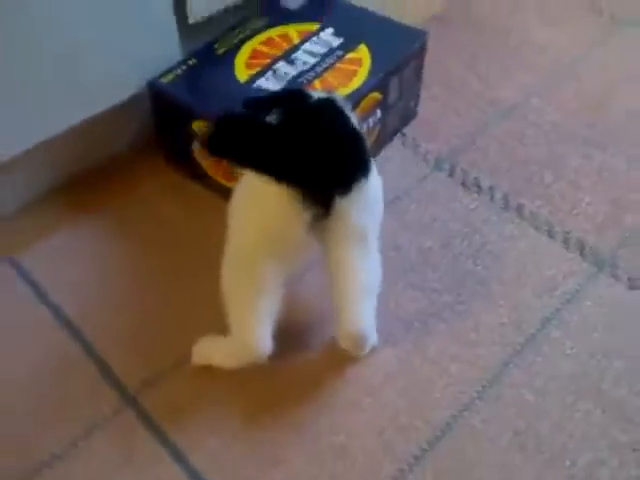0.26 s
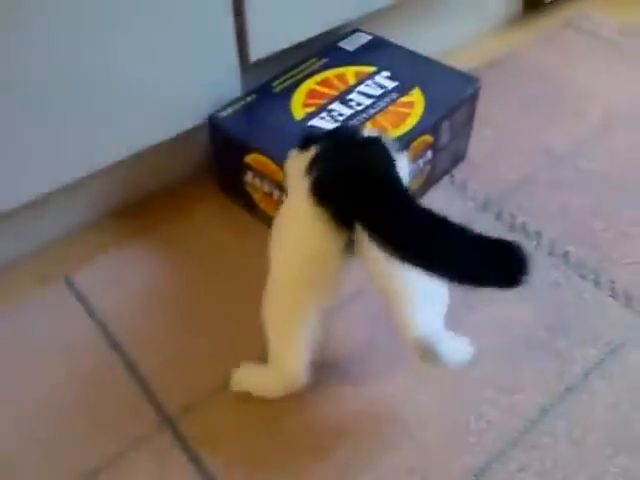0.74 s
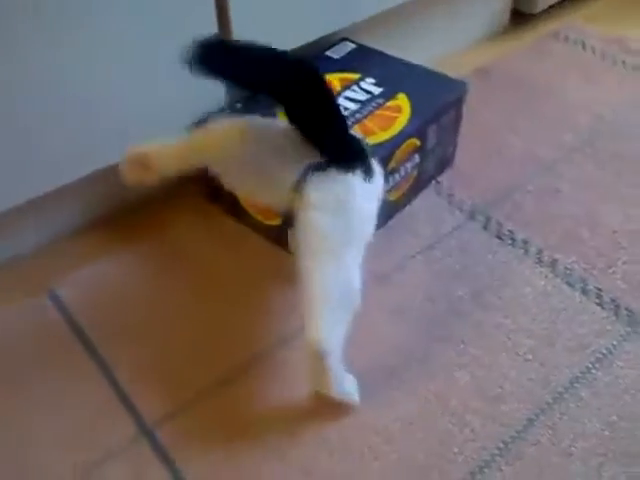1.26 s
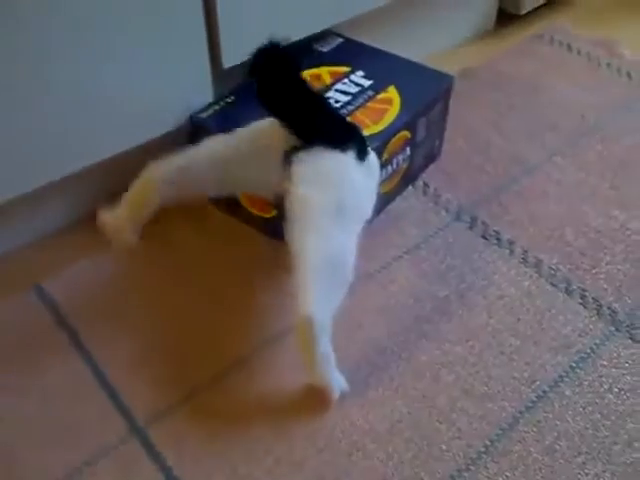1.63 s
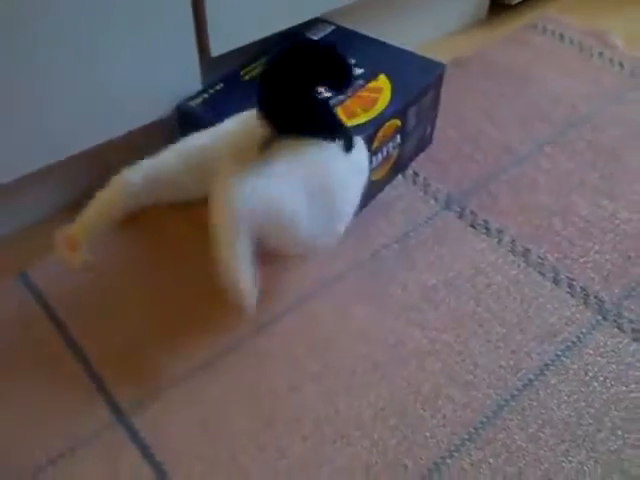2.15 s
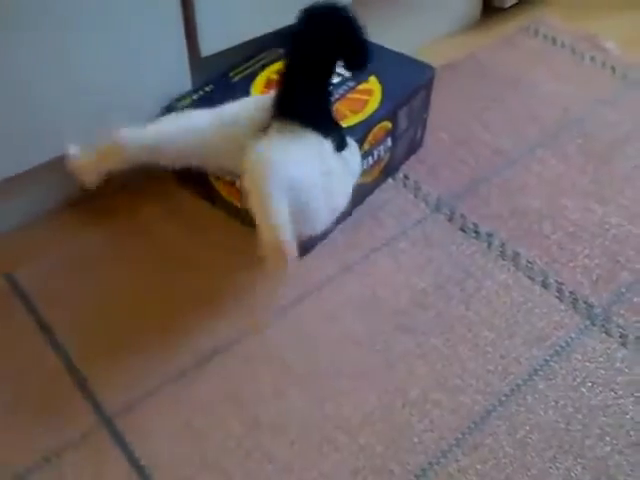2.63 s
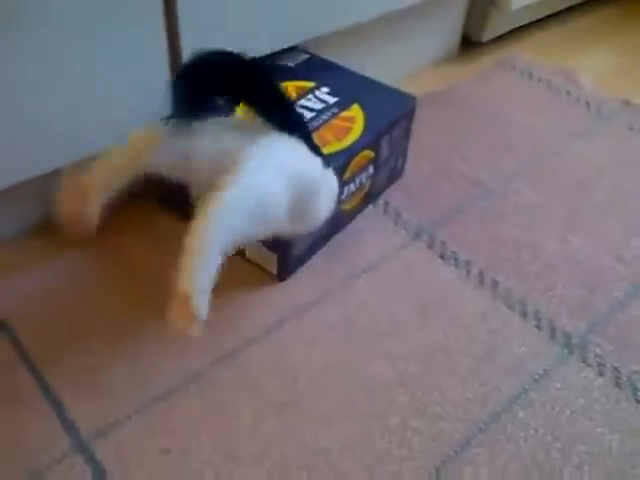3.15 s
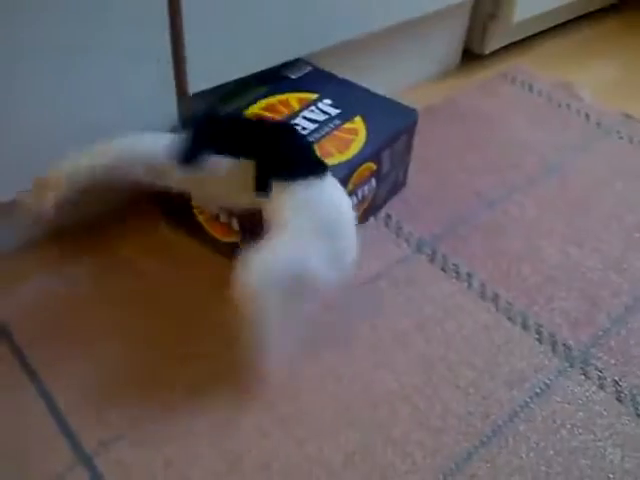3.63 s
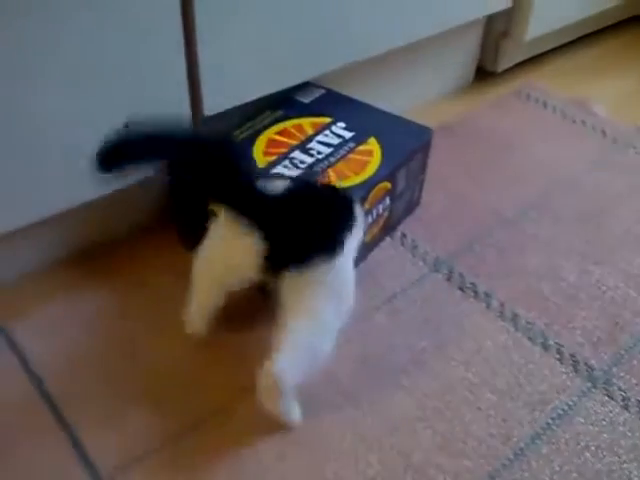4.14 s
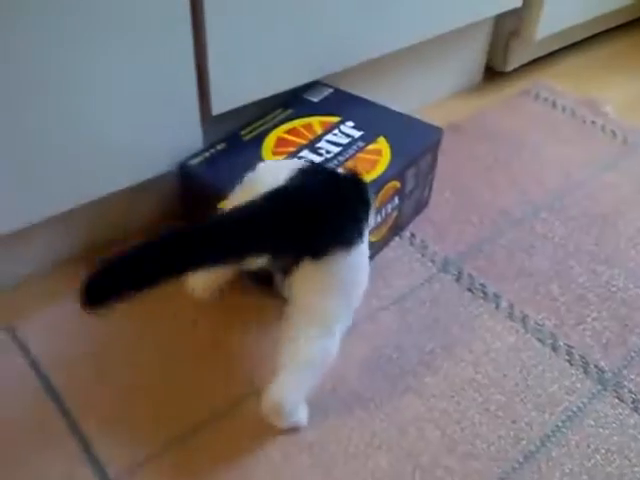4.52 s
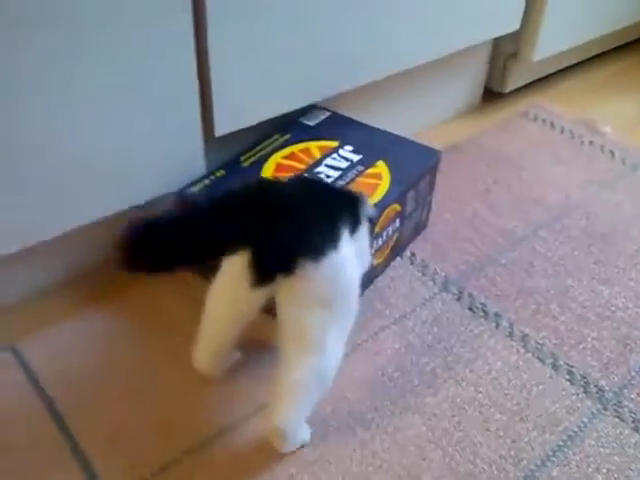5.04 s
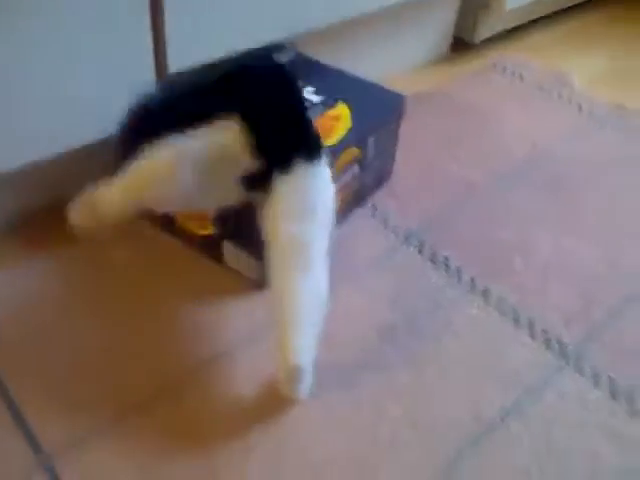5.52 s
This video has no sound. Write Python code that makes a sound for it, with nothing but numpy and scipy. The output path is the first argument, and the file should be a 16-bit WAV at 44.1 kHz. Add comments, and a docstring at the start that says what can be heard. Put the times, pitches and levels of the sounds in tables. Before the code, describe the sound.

A small tiled kitchen heard close on a handheld camera, with faint low rumble, slight hiss and a soft appliance hum. After near-quiet, a light skid and small card ticks begin at 0.35 s, with rubbing near 0.5 and 0.8 s. Sharp snaps crack at about 1.15 s, then a dull bump at 1.3 s and soft thuds and dragging fur around 1.6 s. From 1.8 to 2.1 s a dense burst of scraping, rasping and snapping peaks, followed by quick scuffs and knocks from 2.4 to 2.75 s. It thins to faint rustles and small scuffs, with knocks at 3.4 and 3.86 s. At 4.2 s comes the loudest crack and hollow scrape, trailing into rubbing until about 4.7 s. Another skid follows at 4.85 s, then a low handling bump with a tiny creak at 5.3 s, and muffled box thumps at 5.55 and 5.72 s. Short, bright room echo throughout.

```python
"""A tiled kitchen: a cat shoves its way into a cardboard box on the floor, heard from close by.
The box skids in tiny slips that ring its panels; fur and paws rub and crackle the card.
Snaps are chirps spread by bending waves, panel thocks and padded paw thuds are damped flexes.
Box modes colour the friction and knocks; a short room echo colours these and the paw thuds.
Bumps and creaks of a hand-held camera stay dry, over a wavering noise floor and an appliance's two-tone hum."""
import sys
import numpy as np
from scipy import signal
from scipy.fft import rfft, irfft, next_fast_len
from scipy.io import wavfile
from scipy.ndimage import uniform_filter1d

SR = 44100
rng = np.random.default_rng(int(sys.argv[2]) if len(sys.argv) > 2 else 0)


def materialize(psi):
    """Save the field psi as 16-bit PCM at rate SR to the path in sys.argv[1].

    A 1-D psi becomes a single channel; in a 2-D psi each row is a channel.
    """
    bounded = np.clip(np.atleast_2d(psi).T, -1, 1)
    quanta = np.round(bounded * 32767).astype(np.int16)
    wavfile.write(sys.argv[1], SR, quanta)


N = 254455
TIME = np.arange(N) / SR  # s

# spectrum of fur and paws on card, shared by rub and crackle: (frequency [Hz], level [dB])
RUB_SPECTRUM = [(80, -15), (200, -7), (400, -1), (700, 1), (1200, -2.5), (2000, 0), (2800, 0.5),
                (3500, -2.7), (4500, -9.5), (6000, -17), (8000, -22), (11500, -28), (15500, -42.5)]


def undb(db):
    """Decibels to gain."""
    return 10 ** (np.asarray(db) / 20)


def unit(x):
    """Scale to rms 1."""
    return x / np.sqrt(np.mean(x ** 2))


def add(track, s, sound):
    """Mix a sound into the track at a time in seconds."""
    start = int(s * SR)
    track[start:start + len(sound)] += sound[:N - start]


def filtered(x, response):
    """Filter by a response given as a function of frequency in Hz."""
    size = next_fast_len(2 * len(x))
    f = np.arange(size // 2 + 1) * SR / size + 1e-6  # the offset avoids dividing by 0 Hz
    return irfft(rfft(x, size) * response(f), size)[:len(x)]


def colour(f, points):
    """Gain along (frequency [Hz], level [dB]) points, straight on a log frequency scale."""
    hz, db = np.transpose(points)
    return undb(np.interp(np.log(f), np.log(hz), db))


def above(f, hz):
    """Smooth crossover: near 0 well under hz, near 1 well over it."""
    return 1 / (1 + (hz / f) ** 8)


def fade(t, t60):
    """Exponential decay by 60 dB in t60 seconds."""
    return np.exp(-np.log(1000) * t / t60)


def walk(rate):
    """Smooth random wander of rms 1, with a new target rate times a second."""
    size = max(int(SR / rate), 1)
    steps = np.repeat(rng.standard_normal(N // size + 1), size)
    return unit(uniform_filter1d(steps, size)[:N])


def slips(rate, spread_db, patchy_db, patch_rate):
    """Friction as random tiny slips, rate a second, of uneven size and wandering strength."""
    sizes = rng.standard_normal(N) * undb(spread_db * rng.standard_normal(N))
    happens = rng.random(N) < rate / SR
    return unit(sizes * happens * undb(patchy_db * walk(patch_rate)))


def bend(f, lag_s):
    """Bending waves in a sheet: highs arrive first; lag_s is the delay at 1 kHz."""
    return np.exp(-4j * np.pi * lag_s * np.sqrt(1000 * f))


def flex(t, hz, cycles):
    """A heavily damped sheet: its envelope swells to 1 after so many cycles, then dies away."""
    age = t * hz / cycles
    return np.sin(2 * np.pi * hz * t) * age * np.exp(1 - age)


def swell(start, attack, hold, release):
    """One move, in seconds: it gathers force, holds, then falls by 20 dB per release time."""
    age = TIME - start
    rise = np.sin(np.pi / 2 * np.clip(age / attack, 0, 1)) ** 2
    return rise * undb(-20 * np.maximum(age - attack - hold, 0) / release)


def moves(fidget_db=1.5, fidget_rate=22, jerk_db=0.6, jerk_rate=40):
    """Gains of skid, rasp, boom and hiss: the cat's moves add in power, and all jerk together."""
    # the box slides over the tiles, level before the skid's own trim:
    # (start [s], attack [s], hold [s], release [s per 20 dB], level [dB])
    slides = [ (0.345, .018, .475, .156, -41), (0.66, .025, .03, .06, -41), (0.827, .049, .07, .214, -36),
              (1.389, .2, .243, .177, -42.8), (1.824, .054, .081, .091, -36.5),
              (1.915, .035, .019, .34, -33.9), (2.206, .035, .014, .054, -38.5),
              (3.78, .04, .01, .04, -50.5), (4.229, .025, .018, .28, -27.5),
              (4.492, .097, .052, .295, -42.5), (4.853, .027, .05, .381, -41.2),
              (5.603, .095, .04, .096, -47.5)]
    # strokes of the body along the card, levels before the rub's own trims: (start [s], attack [s],
    # hold [s], release [s per 20 dB], level [dB], boom over level [dB], hiss over level [dB])
    strokes = [ (0.348, .117, .262, .14, -53, -5, -17), (0.484, .06, .022, .04, -44.5, -13, -20),
               (0.79, .11, .04, .2, -41.3, -22, -16), (1.487, .11, .02, .07, -40, 0, -20),
               (1.63, .084, .025, .16, -38.3, -19, -15.5), (1.815, .05, .055, .096, -40.3, -10, -30),
               (1.905, .05, .022, .045, -29.5, -11, -10), (1.974, .045, .01, .21, -33.8, -13, -26),
               (2.2, .038, .028, .04, -46.5, 0, -22), (3.139, .04, .025, .12, -53.5, -14, -16),
               (3.325, .051, .06, .3, -54.7, 3, -9), (4.282, .068, .07, .09, -40.3, 2, -14),
               (4.408, .116, .375, .286, -43, -13, -17.5), (4.865, .035, .085, .158, -49, 0, -11),
               (5.385, .05, .045, .053, -44.5, -18, -11), (5.512, .025, .163, .107, -64, 8, -14),
               (5.716, .01, .05, .1, -51, 6, -15)]
    # short kicks that jog the box and scuff its wall, levels before those trims:
    # (time [s], skid level [dB], rub over skid [dB], release [s per 20 dB])
    scuffs = [ (0.262, -56, -12, .026), (1.159, -41, -5, .121), (2.383, -39, -9, .062),
              (2.444, -38.3, -4, .07), (2.515, -47, 3, .055), (2.561, -43.2, 9, .17),
              (2.738, -45.2, -1, .092), (2.982, -52.5, -6, .021), (3.048, -46, -7, .029),
              (3.287, -42, -2, .2), (3.394, -36.5, -3, .142), (3.693, -46.5, -13, .025),
              (3.862, -39.2, -10, .121), (4.045, -46.6, -12, .031), (4.212, -33.5, 4, .2),
              (5.218, -44.5, -11, .05), (5.716, -37.5, -8, .165)]
    # restless rustle between moves, before fidgets, jerks and trims: (time [s], level [dB])
    rustle_levels = [(0, -76), (0.19, -90), (1.39, -68), (1.44, -57), (2.34, -67), (3.13, -68), (3.6, -64),
                     (4.19, -57), (5.14, -59), (5.44, -63), (5.77, -57)]
    rustle_mix_db = [2.4, 0, -1.2, -8.4]  # skid, rasp, boom, hiss
    scuff_attack_s, scuff_hold_s = .007, .007
    scuff_boom_db, scuff_hiss_db = -8, -23  # boom against skid, hiss against rasp

    rustle = undb(np.interp(TIME, *np.transpose(rustle_levels)) + fidget_db * walk(fidget_rate))
    power = np.outer(undb(rustle_mix_db), rustle) ** 2
    for *shape, db in slides:
        power[0] += (undb(db) * swell(*shape)) ** 2
    for *shape, db, boom_db, hiss_db in strokes:
        mix = undb([db, db + boom_db, db + hiss_db])
        power[1:] += np.outer(mix, swell(*shape)) ** 2
    for s, db, rub_db, release in scuffs:
        mix = undb(db) * undb([0, rub_db, scuff_boom_db, rub_db + scuff_hiss_db])
        power += np.outer(mix, swell(s, scuff_attack_s, scuff_hold_s, release)) ** 2
    return np.sqrt(power) * undb(jerk_db * walk(jerk_rate))


def skid(gain, free_db=-3, loaded_db=-4):
    """The base judders over the tiles and rings the bottom panel; the cat's weight broadens the ring."""
    # spectrum of the empty box skidding: (frequency [Hz], level [dB])
    free_spectrum = [(300, -40), (650, -24), (850, -13), (1030, -3), (1170, 0), (1320, -2), (1600, -14),
                     (2100, -26), (5000, -46)]
    # spectrum with the cat's weight on the box: (frequency [Hz], level [dB])
    loaded_spectrum = [(300, -27), (650, -10.5), (900, -1.5), (1050, 0.5), (1300, 2), (1600, -6.5),
                       (1900, -7), (2500, -12.5), (5000, -42.5)]
    climbs_in_s = 1.14
    judder = slips(rate=2500, spread_db=0.2, patchy_db=0.9, patch_rate=78)
    free = undb(free_db) * unit(filtered(judder, lambda f: colour(f, free_spectrum)))
    loaded = undb(loaded_db) * unit(filtered(judder, lambda f: colour(f, loaded_spectrum)))
    return gain * np.where(TIME < climbs_in_s, free, loaded)


def rub(rasp_gain, boom_gain, hiss_gain, rasp_db=-1.0, boom_db=-3, hiss_db=-2, boom_hz=800, hiss_hz=5500):
    """Fur and paws drag on the card: hollow boom, middle rasp and top hiss each follow their own gain."""
    grains = slips(rate=10000, spread_db=1.5, patchy_db=2, patch_rate=75)
    drag = filtered(grains, lambda f: colour(f, RUB_SPECTRUM))
    rasp = unit(filtered(drag, lambda f: above(f, boom_hz) - above(f, hiss_hz)))
    boom = unit(filtered(drag, lambda f: 1 - above(f, boom_hz)))
    hiss = unit(filtered(drag, lambda f: above(f, hiss_hz)))
    middle_and_low = undb(rasp_db) * rasp_gain * rasp + undb(boom_db) * boom_gain * boom
    return middle_and_low + undb(hiss_db) * hiss_gain * hiss


def crackle(gain, db=-11, rate=130, spread_db=3, lag_s=0.001225):
    """The card creases as it is pressed: sparse ticks, bent into chirps, that grow with the rubbing."""
    signs = rng.choice([-1, 1], N)
    happens = rng.random(N) < rate / SR
    ticks = signs * happens * undb(spread_db * rng.standard_normal(N))
    creases = filtered(ticks, lambda f: colour(f, RUB_SPECTRUM) * bend(f, lag_s))
    return undb(db) * gain * unit(creases)


def knocks(snap_db=6, thock_db=-1, lag_s=.0012, chatter=0.21, chatter_t60=0.022, cycles=0.74):
    """Each blow sends a falling chirp through the card; flaps chatter and the struck panel flexes."""
    # snaps and knocks of the card, strengths before the trims snap_db and thock_db: (time [s],
    # snap strength [dB], sharpness [dB], panel thock level [dB], panel pitch [Hz])
    blows = [ (0.358, -41, -5, -36, 1210), (0.393, -43, -8, -28, 1140), (0.553, -32, -2, -25, 1350),
             (0.939, -31, 0, -19, 1360), (1.105, -43, 6, -37, 4400), (1.148, -21, 8, -16, 4750),
             (1.157, -18.5, 0, -27, 740), (1.1627, -17.5, 11, -19, 4950), (1.728, -27, -3, -28, 1230),
             (1.845, -19.5, -18.5, -20, 1330), (1.907, -28, 8, -40, 1210), (1.945, -14.5, 14, -29, 1000),
             (1.966, -12, -2, -33, 900), (2.025, -14.5, -5, -23, 1200), (2.090, -22, 2, -23, 4300),
             (2.445, -17, -13, -26.5, 700), (2.514, -20, -7.5, -29, 1070), (2.560, -12.5, -17, -25, 1300),
             (2.577, -22, -6, -24, 1400), (2.618, -17, -7, -36, 1000), (2.735, -15.5, -5, -32, 1190),
             (2.985, -39, -8, -42, 650), (3.051, -47, -8, -40, 1020), (3.289, -31, 2, -31, 1200),
             (3.394, -32, 0, -21, 1510), (3.503, -42, -15, -35, 414), (3.699, -38, -14, -35, 606),
             (3.860, -16.5, -4.5, -20, 807), (3.887, -18, -1, -31, 900), (4.211, -1.5, 0, -16.5, 1290),
             (4.245, -13, -12, -10.5, 1130), (4.268, -29, -11, -13, 1150), (4.339, -17, -2, -26, 805),
             (4.405, -16, -4, -30.5, 630), (4.796, -20, 0, -34, 1240), (5.198, -38, -10, -35, 450),
             (5.220, -44, -8, -33, 1200), (5.715, -20.5, -16, -21, 700), (5.743, -43, -12, -28, 1120)]
    # spectrum of a snap: (frequency [Hz], level [dB])
    snap_spectrum = [(80, -16), (250, -9.5), (500, -1.5), (1000, 1), (2000, 5), (3500, 3), (5000, -2.5),
                     (7000, -5.5), (11500, -13), (15500, -30)]
    out, t = np.zeros(N), TIME[:4096]
    noises = rng.standard_normal((len(blows), len(t)))
    for (s, strength_db, sharp_db, panel_db, panel_hz), noise in zip(blows, noises):
        blow = (t == 0) + chatter * noise * fade(t, chatter_t60)
        contact = [(2800, 0), (5400, sharp_db)]  # sharpness tilts the treble
        snap = filtered(blow, lambda f: colour(f, snap_spectrum) * colour(f, contact) * bend(f, lag_s))
        add(out, s, undb(strength_db + snap_db) * snap / np.linalg.norm(snap))
        # the slow bending wave sets the whole panel moving a moment after the snap
        add(out, s + lag_s, undb(panel_db + thock_db) * flex(t, panel_hz, cycles))
    return out


def thuds(db=-1, cycles=0.43):
    """Padded paws and body push softly, so only a damped low flex sounds."""
    # soft falls of paws and body, before the trim db: (time [s], level [dB], pitch [Hz])
    falls = [(1.331, -34, 420), (1.533, -37.5, 167), (1.589, -34, 137), (1.613, -27.5, 164),
             (1.701, -47, 120), (2.224, -40, 270), (2.457, -45, 108), (3.052, -43, 88), (3.42, -39.5, 162),
             (3.502, -47, 191), (3.70, -37, 166), (4.084, -45.5, 188), (4.212, -40.5, 91),
             (4.365, -37.5, 162), (4.596, -41, 120), (4.933, -39, 130), (4.997, -42, 119),
             (5.198, -37, 139), (5.531, -34, 98), (5.564, -32, 118), (5.717, -29, 160), (5.719, -29, 373),
             (5.729, -25, 129)]
    out, t = np.zeros(N), TIME[:SR // 4]
    for s, level_db, hz in falls:
        add(out, s, undb(level_db + db) * flex(t, hz, cycles))
    return out


def box(x, db=-1):
    """The hollow box adds narrow resonances to the friction and knocks that shake it."""
    # modes of the box, before the trim db: (frequency [Hz], width [Hz], gain [dB])
    modes = [(704, 15, -15.5), (900, 21, -5.5), (1042, 7.6, -1), (1163, 17, -20.5), (1262, 15, -6.5),
             (1321, 48, -11), (1520, 19, -2), (1640, 66, -6), (1848, 48, -4.5), (2100, 11, -3),
             (2336, 26, -9.5), (2540, 9.5, -16)]

    def response(f):
        """Direct sound plus one resonance per mode."""
        total = 1
        for hz, width, gain_db in modes:
            total = total + undb(gain_db) / (1 + 1j * (f * f - hz * hz) / (f * width))
        return total

    return undb(db) * filtered(x, response)


def kitchen(x, wet_db, low_t60=0.32, high_t60=0.24, split_hz=5000, gap_s=0.0019):
    """Tiles and cupboard doors return a dense, short echo whose treble dies first."""
    t = TIME[:SR // 2]
    noise = rng.standard_normal(len(t)) * (t > gap_s)
    high = filtered(noise, lambda f: above(f, split_hz))
    echo = (noise - high) * fade(t, low_t60) + high * fade(t, high_t60)
    return x + undb(wet_db) * signal.fftconvolve(x, echo / np.linalg.norm(echo))[:N]


def handling(jolt_hz=150, jolt_cycles=0.12, creak_hz=3100, creak_cycles=.9, shell_hz=1100, shell_cycles=0.49,
             shell=1.0):
    """The hand bumps and creaks the camera: decaying low sways, damped jolts and flexes, with no room."""
    # bumps of the hand: (time [s], sway level [dB], pitch [Hz], 60 dB decay [s], share of hard jolt [0-1])
    bumps = [(0.505, -39, 44, 0.25, .2), (0.575, -38, 60, 0.13, .3), (0.864, -30.5, 52.5, 0.13, .7),
             (1.333, -25.5, 56.4, 0.045, .8), (2.347, -45, 45.5, 0.32, .1), (2.56, -32, 61, 0.1, .5),
             (3.151, -45, 50, 0.11, .5), (5.298, -28.5, 40.6, 0.22, .6), (5.72, -41, 40, .15, .8)]
    # creaks of the camera's shell: (time [s], level [dB])
    creaks = [(5.299, -36), (5.3079, -27.5)]
    out, t = np.zeros(N), TIME[:SR // 4]
    for s, level_db, hz, t60, jolt in bumps:
        sway = np.sin(2 * np.pi * hz * t) * fade(t, t60)
        add(out, s, undb(level_db) * (sway - jolt * flex(t, jolt_hz, jolt_cycles)))
    creak = flex(t, creak_hz, creak_cycles) + shell * flex(t, shell_hz, shell_cycles)
    for s, level_db in creaks:
        add(out, s, undb(level_db) * creak)
    return out


def room_tone(db=-59, waver_db=1.5):
    """A faint wavering rumble and hiss of shaped noise, with an appliance's steady sine hum."""
    # spectrum of the still room: (frequency [Hz], level [dB])
    air_spectrum = [(25, -0.5), (55, -10), (75, -8.5), (110, -13.5), (170, -25.5), (300, -25.5), (450, -37),
                    (700, -30.5), (1200, -33), (2500, -39.5), (5000, -43), (8000, -46), (15000, -44)]
    # hum of a kitchen appliance: (frequency [Hz], rms level [dB])
    hum_lines = [(48, -63), (99, -68)]
    air = unit(filtered(rng.standard_normal(N), lambda f: colour(f, air_spectrum)))
    air = air * undb(waver_db * walk(9))
    hum = np.zeros(N)
    for hz, line_db in hum_lines:
        hum += np.sqrt(2) * undb(line_db) * np.sin(2 * np.pi * hz * TIME)
    return undb(db) * air + hum


def scene():
    """Box and paws in the kitchen, with the camera's handling noise and the room tone added dry."""
    skid_gain, rasp_gain, boom_gain, hiss_gain = moves()
    rubbing = rub(rasp_gain, boom_gain, hiss_gain) + crackle(rasp_gain)
    friction = kitchen(box(skid(skid_gain) + rubbing), wet_db=-6)
    impacts = kitchen(box(knocks()) + thuds(), wet_db=-3.5)
    return (friction + impacts + handling() + room_tone())[None]


def record(dry):
    """The camera cuts the top: a steep elliptic low-pass."""
    top_hz = 15900
    low_pass = signal.ellip(10, .2, 70, top_hz, fs=SR, output="sos")
    return signal.sosfilt(low_pass, dry)


dry = scene()
out = record(dry)
materialize(out)
```